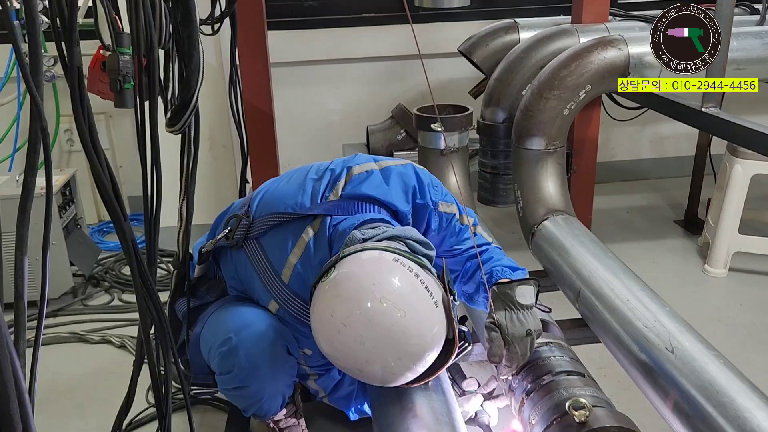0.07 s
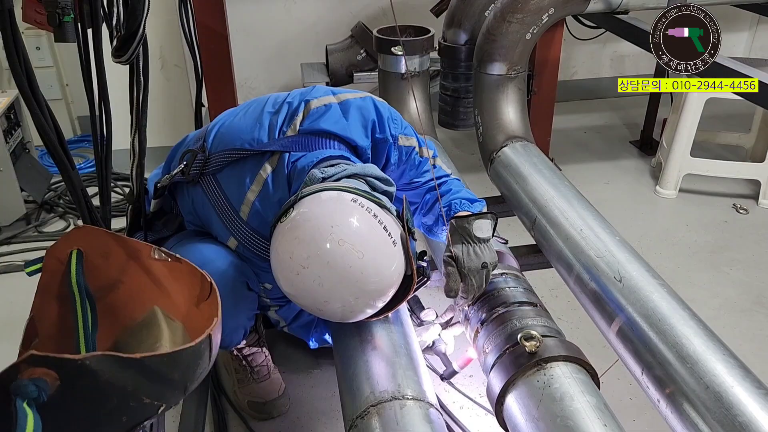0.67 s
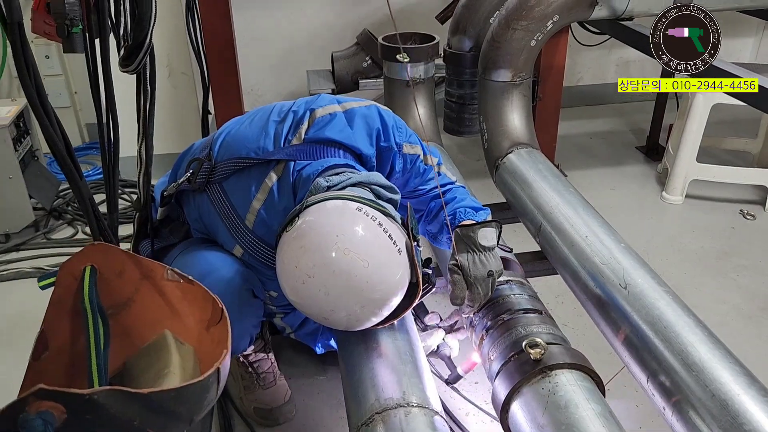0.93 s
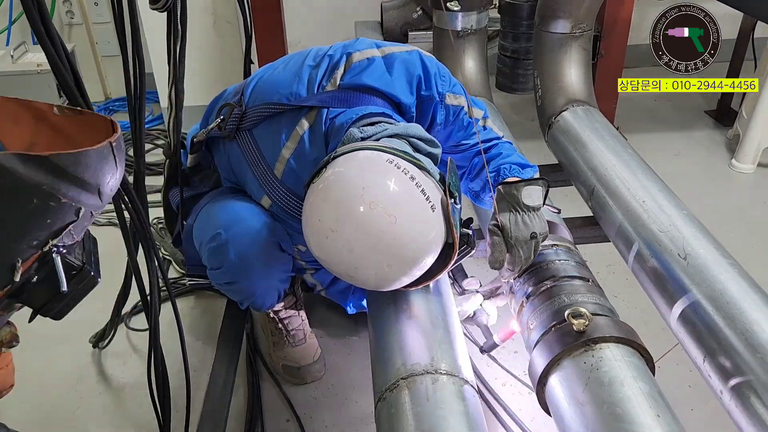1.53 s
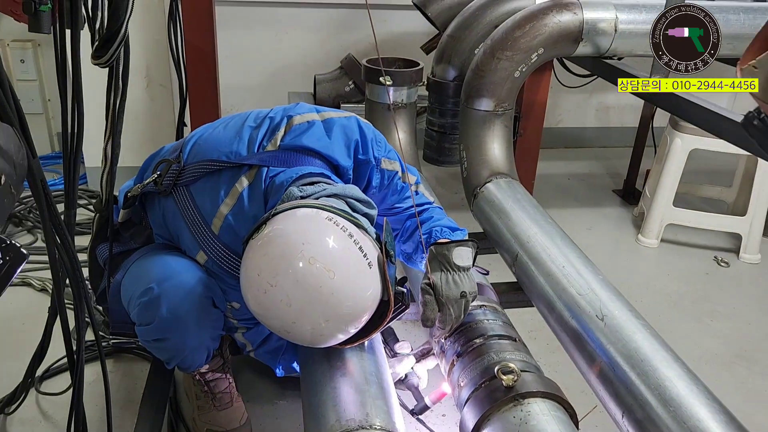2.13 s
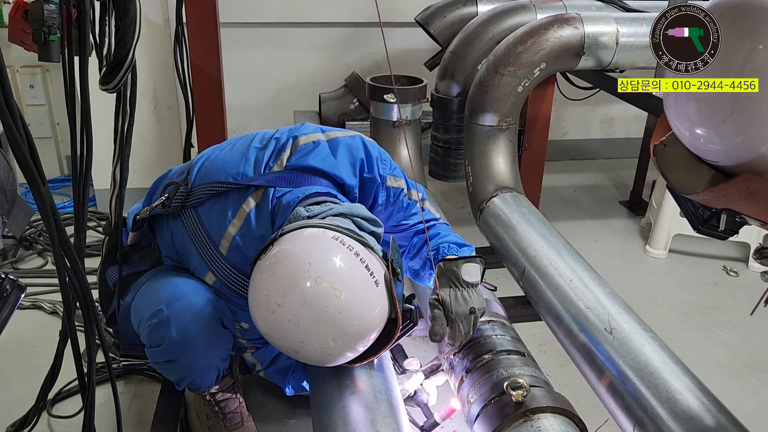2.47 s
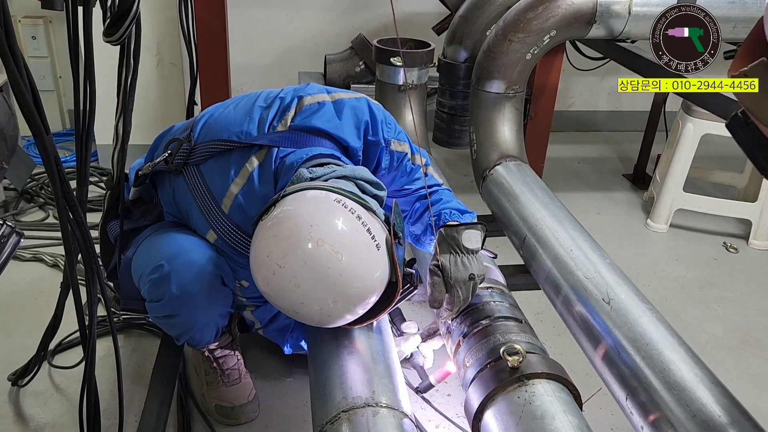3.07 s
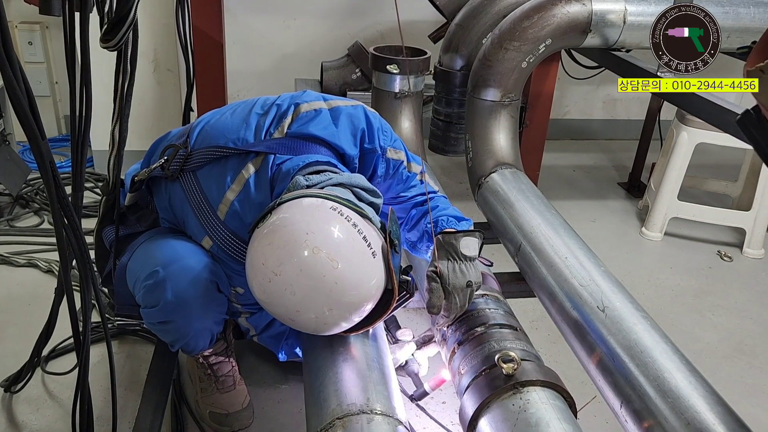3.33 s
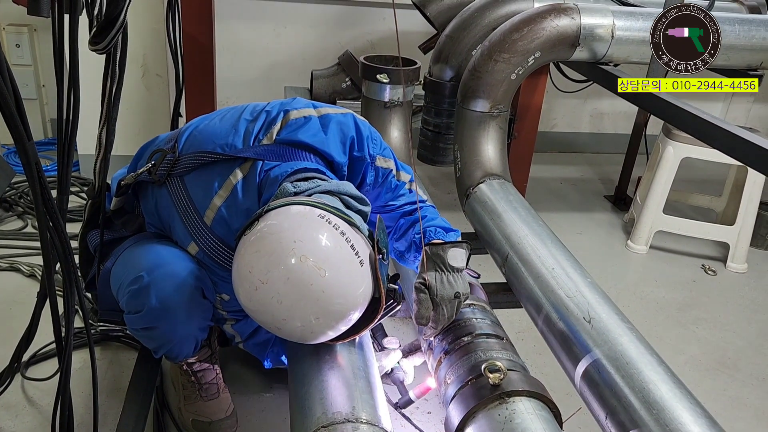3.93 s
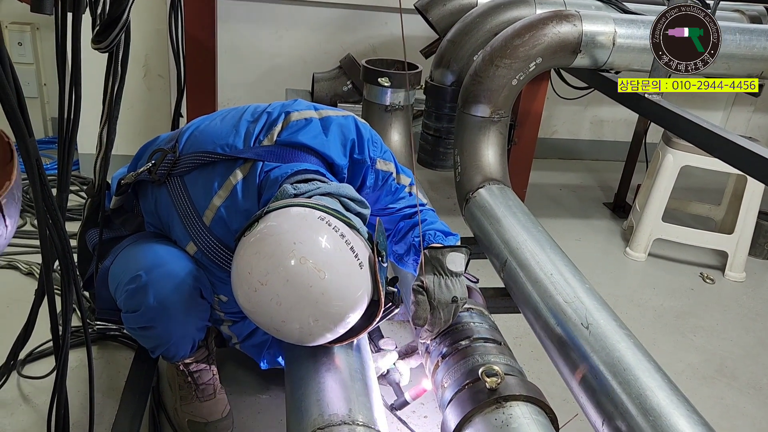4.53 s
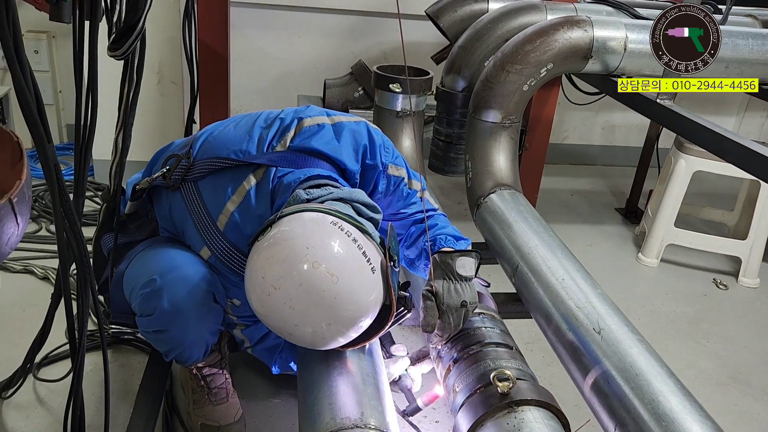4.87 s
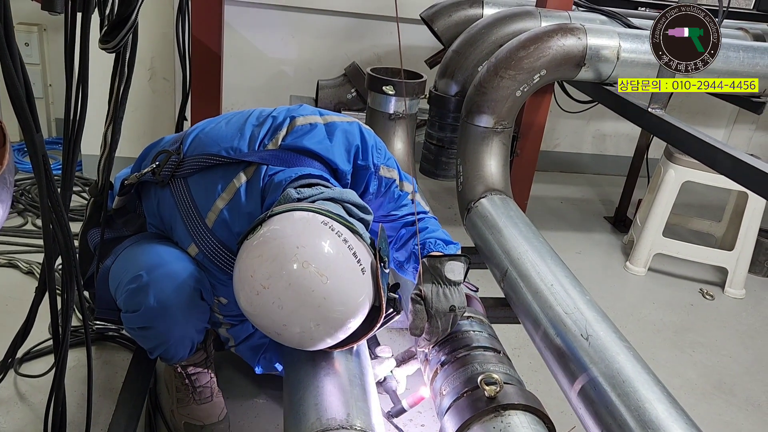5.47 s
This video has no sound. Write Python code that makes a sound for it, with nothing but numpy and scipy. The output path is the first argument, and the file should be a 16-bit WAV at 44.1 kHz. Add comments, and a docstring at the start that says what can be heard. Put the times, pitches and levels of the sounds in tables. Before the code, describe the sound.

Steady high whine of a welder's fans and the even hiss of pipe welding, dotted with short, squeaky spits.

```python
"""A direct-current TIG arc burns steadily on a pipe joint in a workshop. From the start, the welder's
cooling fans whine over the rush of their air and the hiss of the arc and its shielding gas, while the
machine throbs softly. The molten pool spits twice in the first half second: gas whistles out of the
melt, and the floor, walls and pipe answer. More spits follow near 1.3, 2.1 and 3.6 s, among faint ticks
and ringing tones. The fans, the rush and the pool's quiet simmer carry on to the end."""
import sys
import numpy as np
from scipy import signal
from scipy.fft import rfft, irfft
from scipy.io import wavfile

SR = 44100
rng = np.random.default_rng(int(sys.argv[2]) if len(sys.argv) > 2 else 0)


def file_out(sig):
    """Save sig as 16-bit WAV at sys.argv[1]."""
    # one column per channel
    cols = np.atleast_2d(sig).T
    # limit, then scale
    lim = np.clip(cols, -1, 1)
    pcm = np.round(lim * 32767).astype(np.int16)
    wavfile.write(sys.argv[1], SR, pcm)


N = 246519
TIME = np.arange(N) / SR
FREQS_HZ = np.maximum(np.arange(N // 2 + 1) * SR / N, 1)

# Tone colour of the fan air, arc and gas: (frequency [Hz], relative level [dB])
RUSH_COLOUR = [(30, -40.5), (80, -48), (150, -46), (240, -38.5), (450, -28), (580, -25), (820, -17.5),
               (980, -20.5), (1350, -10.5), (2500, -9.5), (3700, -14.5), (4900, -16), (8600, -24.5),
               (15500, -27)]
# Resonances of the air's path: (frequency [Hz], width [Hz], boost or cut [dB])
AIR_RESONANCES = [(2920, 610, 5.5), (4140, 250, 3.5), (4590, 280, 4.5), (4684, 200, -4.5), (5350, 210, 5.5),
                  (6150, 130, 9), (6680, 450, 4), (9900, 340, 4.5)]
# Weak tones of the motors and casing: (frequency [Hz], level [dB])
CASING_TONES = [(442, -83), (678, -80), (733, -73), (958, -73), (1362, -71), (1760, -70), (1922, -70),
                (2498, -70), (2961, -66), (5943, -75), (6724, -72), (6907, -76), (7868, -80)]
# Faint tones that come and go: (time [s], frequency [Hz], level [dB], length [s])
RINGING_TONES = [(1.905, 1753, -56, 0.95), (2.15, 2215, -59, .5), (3.694, 2230, -53, 0.3),
                 (5.42, 2210, -58, 0.22)]
# Tones of the main fan and of its smaller companion: (multiple of the blade rate, relative level [dB])
MAIN_FAN_HARMONICS = [(1, 0), (2, -12.3), (3, -20.5), (4, -25.5), (5, -33), (6, -42), (7, -46)]
SMALL_FAN_HARMONICS = [(1, -8), (2, .5), (3, -15.5), (4, -31), (5, -27), (6, -25)]
# Faint lone ticks of the pool: (time [s], frequency [Hz], level [dB])
POOL_TICKS = [(0.115, 10100, -52), (1.592, 14300, -46), (1.785, 12400, -54), (2.245, 9000, -50.5),
              (2.271, 14600, -45), (2.696, 7910, -51), (2.962, 6300, -43.5), (3.554, 6150, -43),
              (3.596, 14100, -41), (4.177, 6100, -46), (5.000, 8650, -51), (5.012, 11550, -50),
              (5.027, 14100, -46), (5.152, 8100, -51)]
# Loud spits of the pool: (time [s], length [s], whistle [Hz], whistle level [dB], upper whistle [Hz],
# upper width [Hz], upper level [dB], repeat against first whistle [dB], lingering tone [Hz],
# lingering level [dB], burst [Hz], burst level [dB], hiss level [dB], puff level [dB])
POOL_SPITS = [ (0.336, 0.026, 3000, -28.5, 9200, 1600, -37, -4, 4900, -44, 14700, -44, -54, -38),
              (0.414, 0.033, 3440, -34, 12120, 320, -36.5, -11, 3380, -40.5, 14100, -41, -50, -48),
              (1.257, 0.048, 3460, -27, 7860, 250, -64, -3.5, 3400, -46, 14000, -72, -75, -37.5),
              (2.139, .054, 6200, -29, 10920, 218, -33.5, -3, 3650, -48.5, 12900, -28.5, -39, -42.5),
              (3.607, .040, 3890, -20.5, 6800, 450, -29, -4, 3600, -33.5, 14500, -42, -42, -51)]


def undb(db):
    """Turn decibels into a gain to multiply by."""
    return 10 ** (np.asarray(db) / 20)


def unit(x):
    """Scale a sound to an average strength (rms) of 1."""
    return x / np.sqrt(np.mean(x ** 2))


def wander(rate_hz):
    """A smooth random curve of strength 1 that moves at up to about this rate."""
    return unit(irfft(rfft(rng.standard_normal(N)) / (1 + (FREQS_HZ / rate_hz) ** 2), N))


def sine(hz):
    """A pure tone of strength 1 that follows a changing pitch."""
    return np.sqrt(2) * np.sin(2 * np.pi * np.cumsum(hz) / SR)


def noise_band(count, hz, width_hz):
    """Noise of strength 1, passed twice through a resonance to leave a band roughly this wide."""
    b, a = signal.iirpeak(hz, hz / (1.36 * width_hz), SR)
    once = signal.lfilter(b, a, rng.standard_normal(count))
    return unit(signal.lfilter(b, a, once))


def keep_side(x, side, hz, order=2):
    """Keep the "low" or the "high" side of a frequency."""
    return signal.sosfilt(signal.butter(order, hz, side, fs=SR, output="sos"), x)


def add(track, start_s, sound):
    """Mix a sound into a track at the given time."""
    part = track[int(start_s * SR):][:len(sound)]
    part += sound[:len(part)]


def rush(db, flicker_db, ripple_db, swell_db):
    """Swirling air and gas pass fixed resonances; each band flickers and the whole flow swells slowly."""
    points_hz, points_db = np.transpose(RUSH_COLOUR)
    colour_db = np.interp(np.log(FREQS_HZ), np.log(points_hz), points_db)
    for hz, width_hz, peak_db in AIR_RESONANCES:
        colour_db += peak_db * np.exp(-2 * ((FREQS_HZ - hz) / width_hz) ** 2)
    # nearby surfaces put fine peaks and dips into the tone colour
    colour_db += ripple_db * wander(160)[:len(FREQS_HZ)]
    spectrum = rfft(rng.standard_normal(N)) * undb(colour_db)
    half_octave = np.floor(2 * np.log2(np.maximum(FREQS_HZ, 500)))
    air = np.zeros(N)
    for k in np.unique(half_octave):
        air += irfft(spectrum * (half_octave == k), N) * undb(flicker_db * wander(9.7))
    return unit(air) * undb(db + swell_db * wander(.5))


def casing(drift_hz):
    """The motors and panels give faint tones that waver in pitch."""
    return sum(undb(db) * sine(hz + drift_hz * wander(9.95)) for hz, db in CASING_TONES)


def ringing(drift_hz):
    """Soft, wavering tones fade in and out behind the fans."""
    out = np.zeros(N)
    drift = drift_hz * wander(12)
    for start_s, hz, db, length_s in RINGING_TONES:
        count = int(length_s * SR)
        pitch_hz = hz + drift[int(min(start_s, 5) * SR):][:count]
        fade = np.sqrt(np.hanning(count))
        add(out, start_s, undb(db) * fade * sine(pitch_hz))
    return out


def throb(hz, width_hz, peak_db, rate_hz, first_peak_s, depth_db):
    """A narrow band of the machine's noise swells in a regular beat."""
    swell = (.5 + .5 * np.cos(2 * np.pi * rate_hz * (TIME - first_peak_s))) ** 2
    return noise_band(N, hz, width_hz) * undb(peak_db + depth_db * (swell - 1))


def fan(blade_hz, db, harmonics, drift_hz, flutter_db, jitter_hz=.7):
    """Passing blades whine as the shaft's speed drifts; swirls in the intake shake pitch and level."""
    pitch_hz = blade_hz + drift_hz * wander(.97) + jitter_hz * wander(8.6)
    # the higher harmonics feel the swirls more
    return sum(undb(db + relative_db + flutter_db * k * wander(8.3)) * sine(k * pitch_hz)
               for k, relative_db in harmonics)


def workshop(direct, walls_db, pipe_db, low_ring_s=.26, treble_ring_s=.17, pipe_ring_s=.67):
    """Add the room's echo, whose treble dies first, and the hollow ring of the open steel pipe."""
    t = TIME[:SR]
    noise = rng.standard_normal(SR)
    # each ring time is how long the sound takes to fall by 60 dB
    low = keep_side(noise, "low", 2200) * undb(-60 * t / low_ring_s)
    treble = keep_side(noise, "high", 2200) * undb(-6 - 60 * t / treble_ring_s)
    walls = (low + treble) * (1 - np.exp(-t / .011))
    pipe = noise_band(SR, hz=965, width_hz=80) * undb(-60 * t / pipe_ring_s)
    echo = undb(walls_db) * walls / np.linalg.norm(walls) + undb(pipe_db) * pipe / np.linalg.norm(pipe)
    return direct + signal.fftconvolve(direct, echo)[:N]


def squirt(hz, width_hz, db, length_s, rise_s=.0022, close_s=.006, spray_db=-18):
    """Gas whistles through a tiny hole in the melt: a ragged tone with spray that opens fast and sags."""
    t = TIME[:SR // 8]
    raw = signal.hilbert(noise_band(len(t), hz, width_hz))  # abs(raw) is the size of the swing
    # the pressure behind the hole limits how far the whistle can swing
    tone = unit(raw.real / np.sqrt(1 + np.abs(raw) ** 2))
    spray = undb(spray_db) * noise_band(len(t), hz, hz / 4)
    opening = (1 - np.exp(-t / rise_s)) * np.exp(-.4 * t / length_s)
    closing = np.exp(-np.maximum(t - length_s, 0) / close_s)
    return undb(db) * opening * closing * (tone + spray)


def spit(length_s, whistle_hz, whistle_db, upper_hz, upper_width_hz, upper_db, repeat_db,
         linger_hz, linger_db, burst_hz, burst_db, hiss_db, puff_db):
    """A gas pocket breaks: a bright burst and hiss, a dull puff, and two whistles that sound twice."""
    out = np.zeros(SR // 4)
    lag_s, upper_lag_s, whistle_s = .0065, .0023, .0075
    add(out, 0, squirt(burst_hz, width_hz=1000, db=burst_db, length_s=.0086))
    add(out, 0, squirt(hz=13700, width_hz=6100, db=hiss_db, length_s=length_s))
    add(out, lag_s, squirt(hz=2330, width_hz=1700, db=puff_db, length_s=length_s))
    # the repeat is a little lower and softer
    for start_s, pitch, change_db in [(0, 1, 0), (.02, .95, repeat_db)]:
        whistle = squirt(whistle_hz * pitch, width_hz=520, db=whistle_db + change_db, length_s=whistle_s)
        upper = squirt(upper_hz * pitch, upper_width_hz, upper_db + change_db, length_s=.0068)
        add(out, start_s + lag_s, whistle)
        add(out, start_s + upper_lag_s, upper)
    # the whistles drain away in thin tones
    add(out, lag_s + whistle_s, squirt(linger_hz, width_hz=230, db=linger_db, length_s=length_s))
    add(out, upper_lag_s, squirt(upper_hz, upper_width_hz, upper_db - 6, length_s))
    return out


def molten_pool(simmer_db, simmer_count):
    """Gas leaves the melt in an even simmer of tiny squirts, a few loud spits and faint ticks."""
    out = np.zeros(N)
    for when, pitch, size in rng.random((simmer_count, 3)):
        tiny = squirt(hz=5350 + 900 * pitch, width_hz=300, db=simmer_db + 6 * size, length_s=.004)
        add(out, when * N / SR, tiny)
    for start_s, *shape in POOL_SPITS:
        add(out, start_s, spit(*shape))
    for start_s, hz, db in POOL_TICKS:
        add(out, start_s, squirt(hz, width_hz=.066 * hz, db=db, length_s=.016))
    return keep_side(out, "high", hz=750, order=4)  # so small a source gives off no bass


def scene():
    """Mix the rush, the machine's quieter sounds, three fans and the spitting pool."""
    air = rush(db=-46, flicker_db=.86, ripple_db=2, swell_db=.33)
    machine = casing(drift_hz=3.04) + ringing(drift_hz=11)
    machine += throb(hz=1608, width_hz=80, peak_db=-53.5, rate_hz=4.94, first_peak_s=.08, depth_db=20)
    fans = fan(blade_hz=2030.8, db=-40, harmonics=MAIN_FAN_HARMONICS, drift_hz=.6, flutter_db=.3)
    fans += fan(blade_hz=2082.2, db=-51, harmonics=SMALL_FAN_HARMONICS, drift_hz=1.3, flutter_db=.4)
    fans += fan(blade_hz=795.8, db=-56, harmonics=[(1, 0)], drift_hz=.2, flutter_db=.7)
    pool = workshop(molten_pool(simmer_db=-51, simmer_count=120), walls_db=-13.5, pipe_db=-9.5)
    return (air + machine + fans + pool)[None]


def record(dry):
    """Fade both ends quickly and cut the highest treble."""
    fade_s, top_hz = .004, 15650
    fade = np.clip(np.minimum(TIME, TIME[-1] - TIME) / fade_s, 0, 1)
    return signal.sosfilt(signal.ellip(12, .2, 80, top_hz, fs=SR, output="sos"), dry * fade)


dry = scene()
out = record(dry)
file_out(out)
```